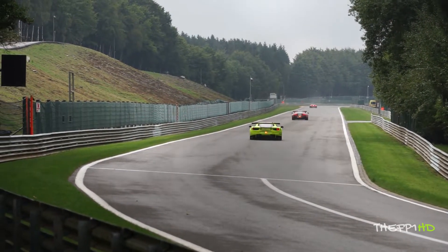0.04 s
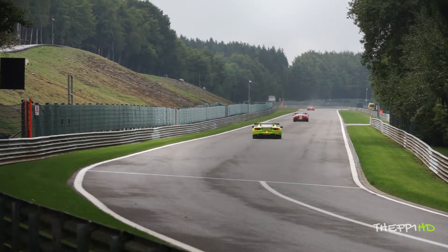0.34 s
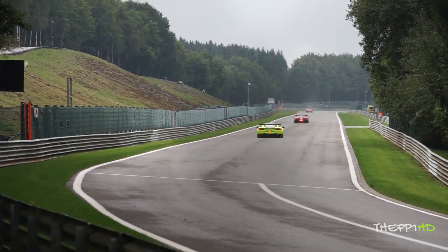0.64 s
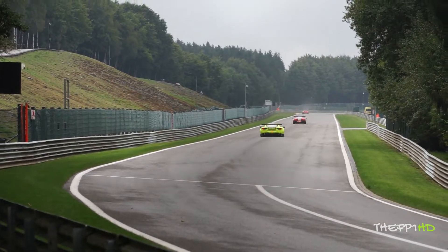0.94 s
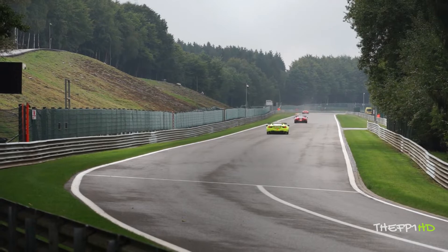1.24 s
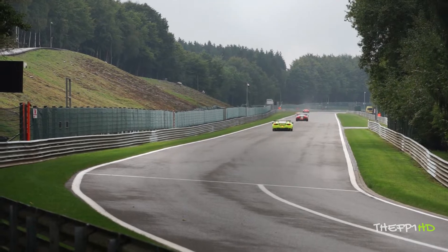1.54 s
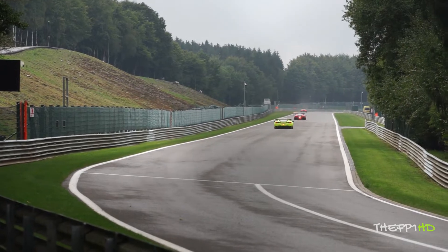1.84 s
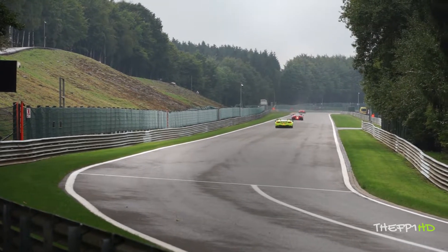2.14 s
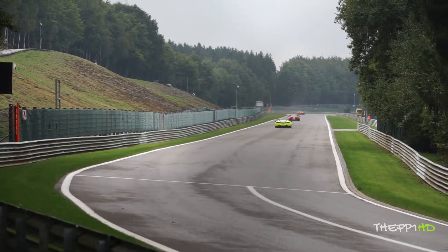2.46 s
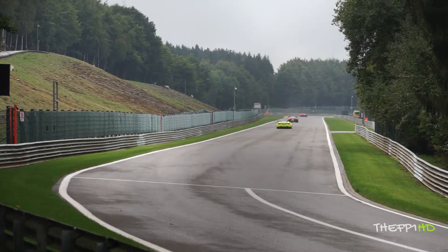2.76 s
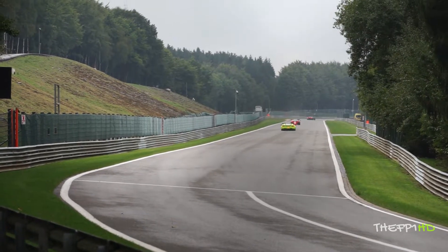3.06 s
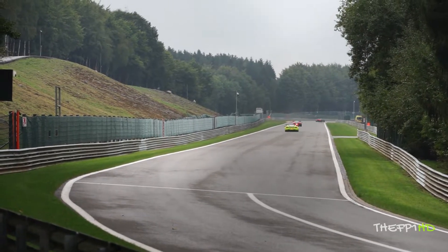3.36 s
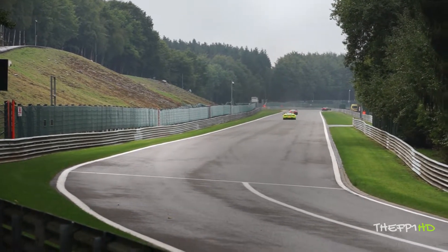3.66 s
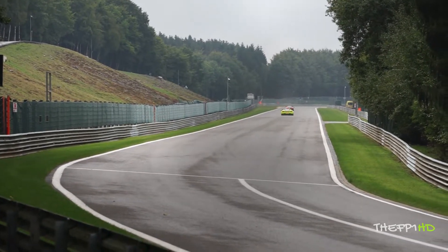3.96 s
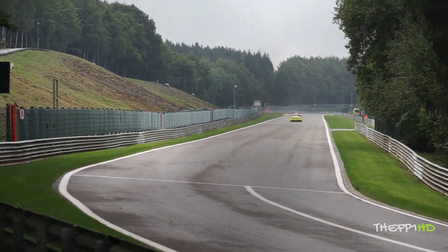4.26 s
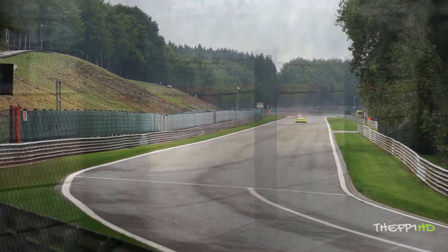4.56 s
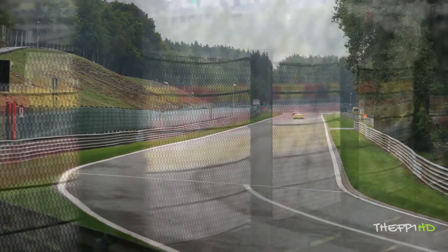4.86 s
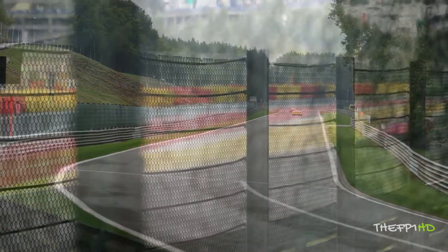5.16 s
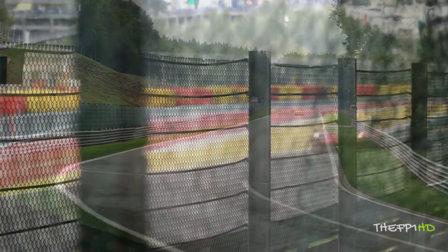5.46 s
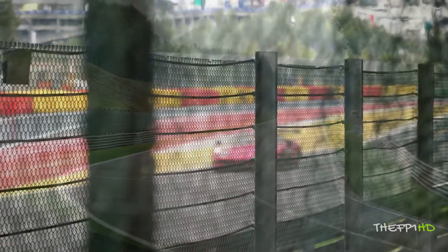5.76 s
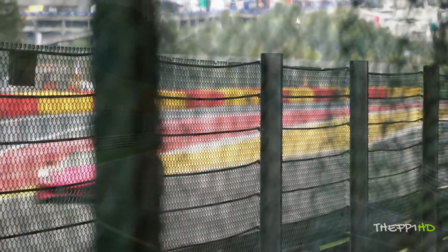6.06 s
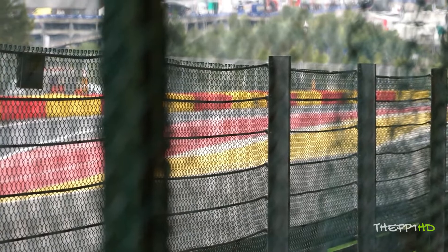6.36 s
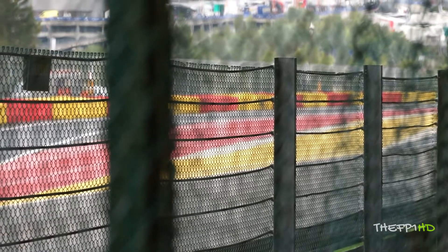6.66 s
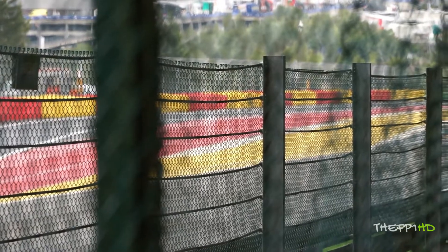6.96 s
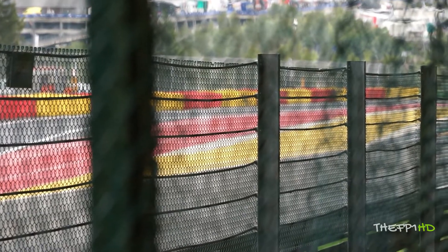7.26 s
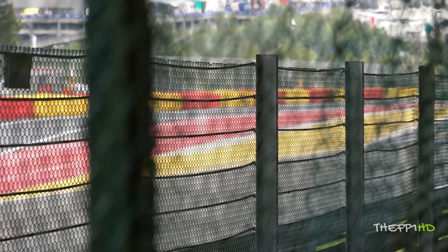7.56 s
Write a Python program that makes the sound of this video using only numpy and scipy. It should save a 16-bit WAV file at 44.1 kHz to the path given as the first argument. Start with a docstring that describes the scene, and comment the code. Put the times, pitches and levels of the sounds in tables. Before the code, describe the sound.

A race car drones away up a damp straight at full throttle, its note barely rising over a rough exhaust roar. A slightly higher engine ahead throbs against it briefly, then eases off. The drone fades and stops as another car approaches and races close past the trackside microphone toward the left. Its howl drops in pitch, with hissing wet tyres and an echo from the barriers.

```python
"""Race cars on a damp track

A V8 engine drones away up the straight, its exhaust puffs so fast that they blend into a note.
A second car hums ahead of it, and each note stops when its driver comes off the throttle.
A third car then races close by toward the left: its note drops, its wet tyres hiss and the barriers echo."""
import sys
import numpy as np
from scipy import signal
from scipy.fft import rfft, irfft, next_fast_len
from scipy.io import wavfile
from scipy.ndimage import uniform_filter1d, map_coordinates

SR = 44100
rng = np.random.default_rng(int(sys.argv[2]) if len(sys.argv) > 2 else 0)


def to_wav(sig):
    """Store sig (one row per channel, or 1-D mono) as 16-bit WAV at the path in sys.argv[1].

    Samples outside -1..1 are clipped; the rate is SR.
    """
    pcm = np.clip(np.atleast_2d(sig), -1, 1) * 32767
    pcm = np.round(pcm).astype(np.int16)
    wavfile.write(sys.argv[1], SR, pcm.T)  # frames by channels


N = 335601
T = np.arange(N) / SR
PASS_S = 7.043  # the moment the third car is closest

# hiss of water thrown up by tyres: (frequency [Hz], relative level [dB])
SPRAY_TONE = [(3500, -23.5), (6500, 9.5), (8500, 6), (11000, 3), (13500, -1), (15700, -14)]


def v8(angle):
    """Eight firings per engine cycle make the drone; uneven exhaust pipes add weaker tones."""
    # strongest overtones: (multiple of the cycle rate, level above the drone [dB], left minus right [dB])
    overtones = [(12, -20.5, 0), (16, -21, -5.5), (20, -24.5, -8.5)]
    # an overtone sings out: (multiple of the cycle rate, middle [s], half length [s], boost [dB])
    swells = [(20, 0.32, 0.23, 11.5), (20, 1.27, 0.12, 9), (16, 2.4, 1.2, 6), (20, 2.89, .55, 11.5),
              (12, 3.4, 1.48, 9.5), (20, 3.8, .17, 13.5), (20, 5.15, 0.41, 9.5)]
    # weaker tones: (multiple of the cycle rate, relative level [dB])
    weak_tones = [(1, -47.5), (2, -36), (3, -35.5), (4, -20), (5, -37.5), (6, -13.5), (7, -14.5), (9, -18),
                  (10, -31.5), (11, -22), (13, -24), (14, -39), (15, -32), (17, -39), (18, -29.5),
                  (19, -23), (21, -43), (22, -23), (23, -30), (24, -25), (25, -35), (26, -39.5), (27, -36),
                  (28, -28), (29, -37), (30, -38), (31, -33.5), (32, -33)]
    drone_db, rumble_db, roar_db = exhaust_levels()
    drone = amp(drone_db - 0.23) * tone(8 * angle, scatter=0.021, rate=22, apart=0.72)
    out = pan(drone, left_db=-3 + 0.43 * T)  # drifts from the right toward the middle
    for k, db, left_db in overtones:
        boost_db = sum(boost * swell(s, half, flatness=4) for which, s, half, boost in swells if which == k)
        overtone = tone(k * angle, scatter=0.13, rate=9, apart=0.95)
        out += pan(amp(drone_db + db + boost_db) * overtone, left_db)
    throb, burble = amp(rumble_db + 9.5), amp(roar_db + 9)
    for k, db in weak_tones:
        gain = throb if k < 8 else burble
        out += amp(db) * gain * tone(k * angle, scatter=0.44, rate=5, apart=0.34)
    return out * (1 - ramp(5.83, 0.046))  # the driver comes off the throttle


def exhaust_levels():
    """The V8's drone, rumble and roar in dB: the two noises partly follow the drone."""
    # the drone as the car drives away: (time [s], level [dB])
    drone_levels = [(0.06, -14.5), (0.54, -12), (1.88, -11.5), (2.59, -12), (2.63, -13), (3.27, -12),
                    (3.38, -13), (4.22, -12), (5.18, -17), (5.8, -23.5)]
    drone_db, = curves(drone_levels)
    swing_db = drone_db + 12.5
    rumble_db = -31.5 + 0.9 * swing_db + 1.12 * T
    roar_db = -25 + 0.55 * swing_db
    return drone_db, rumble_db, roar_db


def exhaust_noise(angle):
    """The V8's exhaust gas rumbles, roars in puffs and rasps; distance takes the rasp first."""
    # low, middle and high gas noise, each: (frequency [Hz], relative level [dB])
    rumble_tone = [(20, -56), (33, -29.5), (45, -15), (85, -18.5), (110, -7.5), (140, 2), (215, 0),
                   (270, -2), (400, -11.5), (900, -70.5)]
    roar_tone = [(150, -22), (330, 4), (560, -0.5), (850, 0.5), (1150, -6), (1600, -9.5), (2300, -15.5),
                 (3200, -25.5), (5000, -40.5), (8000, -67.5)]
    rasp_tone = [(700, -22), (1200, 3), (1700, 10), (2300, 6.5), (3500, 0.5), (5000, -6.5), (6500, -15),
                 (8000, -25), (11000, -46.5), (15000, -54.5)]
    _, rumble_db, roar_db = exhaust_levels()
    puffs = unit(1 + .17 * np.cos(8 * angle) + .16 * np.cos(4 * angle)
                 + .12 * np.sin(2 * angle) + .1 * np.sin(angle))
    rasp = (amp(-33 - 5 * T) + amp(-58.5)) * noise(rasp_tone, patchy_db=2)
    dull = ramp(0.33, 4.6) * (1 - 0.87 * ramp(4.4, .8))  # the treble fades with distance, then returns
    rasp = (1 - dull) * rasp + dull * filtered(rasp, lambda hz: amp(-(hz / 3400) ** 2))
    roar = amp(roar_db) * noise(roar_tone, patchy_db=1.5)
    rumble = amp(rumble_db) * noise(rumble_tone, patchy_db=0.5)
    fade = np.sqrt(1 - ramp(4.47, 2.9))
    return pan((rumble + puffs * roar + rasp) * fade, left_db=-2.5)


def passing_car(speed_m_per_s=61.5, distance_m=14.2, sound_m_per_s=343):
    """A car sweeps by: its sound waves are squeezed as it comes and stretched as it goes (Doppler)."""
    # its noises over time: (time [s], relative exhaust roar [dB], relative machinery rush [dB])
    noise_levels = [(5.92, -37.5, -49), (5.932, -33, -46.5), (6.146, -29, -42), (6.61, -23, -31.5),
                    (6.81, -26.5, -32), (7.506, -23, -30.5), (7.52, -26, -32.5)]
    # exhaust roar and machinery rush, each: (frequency [Hz], relative level [dB])
    roar_tone = [(40, -46), (110, -11), (180, 1.5), (260, -4), (360, 6.5), (600, 5), (900, 5.5),
                 (1300, 0.5), (2100, -8.5), (3000, -15), (5000, -43.5), (9000, -68.5)]
    rush_tone = [(1200, -17), (1900, 2), (2500, 0.5), (3600, -1.5), (4800, -5), (6000, -8), (7500, -16.5),
                 (10000, -37.5), (15000, -50.5)]
    past_m = speed_m_per_s * (T - PASS_S)
    away = past_m / np.hypot(past_m, distance_m)  # -1 coming, 0 closest, 1 going
    firing_hz = 183.6 + 3.64 * (T - PASS_S)  # one row of six cylinders, slowly revving up
    heard_hz = firing_hz / (1 + away * speed_m_per_s / sound_m_per_s)
    angle = cycle_angle(heard_hz / 6 * (1 + .002 * wobble(30)))
    fade_in_db = 12 * np.minimum(T - 5.74, 0)  # the third car's sound fades in
    roar_db, rush_db = curves(noise_levels)
    puffs = unit(1 + 0.1 * np.cos(6 * angle) + 0.072 * np.cos(angle))
    roar = amp(roar_db + fade_in_db + 3) * noise(roar_tone, patchy_db=1.5)
    rush = amp(rush_db + fade_in_db + 1) * noise(rush_tone, patchy_db=1.8)
    cloud = spray_and_wind()
    left_db = 5.5 + 2.2 * away
    car = pan(passing_engine(angle, fade_in_db), left_db) + pan(puffs * (roar + rush), .45 * left_db)
    right_delay_ms = 0.11 + 0.077 * away  # the right ear hears it later and later
    car[1] = map_coordinates(car[1], [np.arange(N) - right_delay_ms / 1000 * SR], order=3)
    return ramp(4.4, 0.5) * (car + pan(cloud, .2 * left_db))  # the wide cloud has little direction


def passing_engine(angle, fade_in_db):
    """We hear the air intake and whining gears as the car comes, and its tail pipes as it goes."""
    # engine tones: (multiple of the cycle rate, relative level in front [dB], relative level behind [dB])
    engine_tones = [(3.88, -24, -35), (4.974, -4, -35.5), (6.045, 2, -2), (6.7, -27, -15.5),
                    (8.93, -22.5, -24), (9.89, -21.5, -35), (11.06, -19, -16.5), (12.1, 3, 0),
                    (18.15, -6.5, -1), (24, -10.5, -1), (30.1, -10.5, -6.5), (30.65, -20, -4),
                    (36, -14, -16.5), (41.9, -27, -25.5), (48.8, -24.5, -14), (53.5, -24, -21),
                    (61.2, -26, -15.5), (65, -34, -14.5), (73.3, -32, -14.5)]
    clear = (1 - np.cos(np.pi * ramp(6.045, 0.48))) / 2  # the car comes into the open
    engine_db = -34.5 + fade_in_db + 13 * clear - 8 * np.maximum(T - 7.01, 0)
    far, facing = 1 - ramp(6.17, 0.32), swell(6.67, 0.21)
    beside, behind = swell(PASS_S - .05, 0.4), ramp(7.0, .36)
    howl_db = 5.5 * swell(7.02, 0.29) - 3.5  # the full firing note is beamed just ahead of the car
    growl_db = 4 - 15 * ramp(6.26, 0.6)  # the low growl shrinks as it nears
    boost_db = {12: howl_db, 5: growl_db}
    out = np.zeros((2, N))
    for k, front_db, rear_db in engine_tones:
        flutter_db = 3.1 * far * wobble(22)  # moving air on the long path
        db = engine_db + front_db + behind * (rear_db - front_db) + boost_db.get(round(k), 0) + flutter_db
        phase = k * angle
        if k >= 40:  # the highest tones are thrown forward
            db = db + 7 * facing
        if k >= 18:  # from the side, only a smeared part of the high tones gets through the fence
            db = db - 2.6 * beside
            phase = phase + (.22 + 1.2 * beside) * wobble(45)
        out += amp(db) * tone(phase, scatter=.01 * k, rate=18, apart=.6)
    gear_whine = sum(tone(k * angle, scatter=3, rate=170, apart=1.5) for k in (128, 133))
    out += amp(-45) * facing * gear_whine
    echo = barrier_echo(out)
    return out + amp(-18) * echo.mean(axis=0) + amp(-12) * echo


def spray_and_wind():
    """The passing car pushes a gust of air ahead of it and trails a hissing cloud of spray."""
    # the gust: (frequency [Hz], relative level [dB])
    gust_tone = [(20, -40), (33, -19.5), (45, -11), (80, 2), (125, 1.5), (200, 11.5), (400, -20.5),
                 (900, -63.5)]
    gust = amp(-26.5 + 2.7 * wobble(12)) / np.hypot(1, (T - 6.45) / .55) ** 2
    spray_db = -40 - 102.5 * np.log10(np.hypot(1, (T - 7.155) / 0.77))  # falls steeply with distance
    spray = amp(spray_db + 2 * wobble(9) + 1.2 * wobble(80)) + amp(-81.5)
    return spray * noise(SPRAY_TONE, patchy_db=0.1) + gust * noise(gust_tone, patchy_db=1)


def barrier_echo(x, decay_s=0.91, build_s=0.076, size=32768):
    """Walls and stands throw back a blur of echoes, different at each ear."""
    t = np.arange(size) / SR
    tail = rng.standard_normal((2, size)) * amp(-60 * t / decay_s) * (1 - np.exp(-(t / build_s) ** 2))
    return signal.fftconvolve(x, tail / np.linalg.norm(tail[0]), axes=1)[:, :N]


def car_ahead():
    """A slightly higher engine note throbs against the V8 until its driver eases off."""
    # its note: (time [s], firing rate [Hz], level [dB])
    note = [(0, 338.6, -34), (.4, 336.5, -32), (1, 343, -36.5), (1.35, 346, -33.5), (1.43, 339.5, -41),
            (1.55, 314, -34), (1.7, 305.7, -63.5)]
    # its tones: (multiple of the cycle rate, relative level [dB])
    engine_tones = [(4, -5), (5, -16.5), (8, 5.5), (12, -19.5), (16, 2.5), (20, -18.5), (24, -6.5)]
    firing_hz, note_db = curves(note)
    angle = cycle_angle(firing_hz / 8)
    return sum(amp(note_db + db) * tone(k * angle, scatter=0.037, rate=6.9, apart=0.16)
               for k, db in engine_tones)


def v8_spray():
    """The hiss of the V8's wet tyres is soon lost in the air."""
    return amp(-64 - 18 * T) * noise(SPRAY_TONE, patchy_db=0.5)


def ticks(size=512, crackles=110, decay_s=.005):
    """Tiny dry ticks close by, over a fainter crackle."""
    # the clearer ticks: (time [s], relative level [dB])
    clear_ticks = [(1.116, -45), (1.713, -49), (1.7775, -48.5), (2.212, -58), (2.587, -47.5), (2.8903, -47),
                   (3.1431, -58.5), (3.488, -63)]
    out, t = np.zeros((2, N)), np.arange(size) / SR
    crackle = [(when * (T[-1] - .1), -63 + 12 * loud ** 2) for when, loud in rng.random((crackles, 2))]
    for s, db in list(clear_ticks) + crackle:
        start = round(s * SR)
        out[:, start:start + size] += amp(db - 4 - 60 * t / decay_s) * rng.standard_normal((2, size))
    return out


def background():
    """A very faint, steady hush."""
    # the hush: (frequency [Hz], relative level [dB])
    hush_tone = [(20, -8), (60, -6), (1000, 4), (8000, -28.5), (15000, -29.5)]
    return amp(-70.5) * noise(hush_tone)


def tone(phase, scatter, rate, apart, size=1024):
    """One engine tone: a direct wave plus drifting scattered ones, partly different at each ear."""
    coarse = T[::128]
    points = rng.standard_normal((3, size)) + 1j * rng.standard_normal((3, size))
    shared, *ears = [map_coordinates(p, [coarse * rate], mode="wrap") for p in points]
    paths = unit(1 + scatter * (shared + apart * np.array(ears))) * np.exp(2j * np.pi * rng.random())
    wave = np.exp(1j * phase)
    return np.sqrt(2) * np.array([(np.interp(T, coarse, p) * wave).real for p in paths])


def noise(spectrum, patchy_db=0):
    """Stereo noise of strength 1; swirling air gives it louder and softer patches."""
    # how alike the two ears hear it: (frequency [Hz], likeness [0 to 1])
    likeness = [(60, 1), (250, 0.7), (600, 0.37), (1200, 0.44), (2500, 0.5), (5000, 0.69), (9000, 0.38)]

    def shape(hz):
        width = np.arccos(np.clip(along(likeness, hz), -1, 1)) / 2
        return amp(along(spectrum, hz)) * np.array([np.cos(width), np.sin(width)])

    slices = signal.stft(rng.standard_normal((2, N)), nperseg=1024)[2]
    patches = uniform_filter1d(rng.standard_normal(slices.shape[1:]), size=6, axis=0)
    patches = uniform_filter1d(patches, size=9, axis=1)
    pair = signal.istft(slices * amp(patchy_db * unit(patches)), nperseg=1024)[1][:, :N]
    mid, side = filtered(pair, shape)
    return unit(np.array([mid + side, mid - side]))


def cycle_angle(cycle_hz):
    """An angle that turns once per engine cycle, in which every cylinder fires once."""
    return 2 * np.pi * np.cumsum(cycle_hz) / SR


def amp(db):
    """Turns decibels into a gain."""
    return 10 ** (np.asarray(db) / 20)


def unit(x):
    """Scales x to an average strength (rms) of 1."""
    return x / np.sqrt(np.mean(np.abs(x) ** 2) + 1e-20)


def along(points, hz):
    """Joins (frequency, value) points, giving each octave equal room."""
    freqs, values = np.transpose(points)
    return np.interp(np.log(hz + 1), np.log(freqs + 1), values)


def curves(rows):
    """One value per sample for each column after the time."""
    times, *columns = np.transpose(rows)
    return [np.interp(T, times, column) for column in columns]


def ramp(start_s, length_s):
    """Rises from 0 to 1."""
    return np.clip((T - start_s) / length_s, 0, 1)


def swell(middle_s, half_s, flatness=2):
    """1 in the middle, falling away on both sides."""
    return np.exp(-np.abs((T - middle_s) / half_s) ** flatness)


def wobble(rate, size=2048):
    """A smooth curve through `rate` random points a second."""
    coarse = T[::128]
    return np.interp(T, coarse, map_coordinates(rng.standard_normal(size), [coarse * rate], mode="wrap"))


def filtered(x, response):
    """Scales each frequency in x by response(hz)."""
    size = next_fast_len(N + SR // 4, True)
    return irfft(rfft(x, size) * response(np.fft.rfftfreq(size, 1 / SR)), size)[..., :N]


def pan(x, left_db):
    """Makes the left ear left_db louder than the right."""
    return np.array([x[0] * amp(left_db / 2), x[1] * amp(-left_db / 2)])


def scene():
    """Adds up the three cars and the faint sounds around them."""
    # the V8's slowly rising note: (time [s], firing rate [Hz])
    v8_note = [(0, 317.4), (1, 317.4), (2, 322), (3, 323), (4, 325.9), (4.5, 327.5), (5, 328.4),
               (5.9, 330.5)]
    firing_hz, = curves(v8_note)
    angle = cycle_angle(firing_hz / 8)
    return (v8(angle) + car_ahead() + exhaust_noise(angle) + v8_spray()
            + passing_car() + ticks() + background())


def record(dry, top_hz=15720):
    """Cuts off the very highest treble."""
    return filtered(dry, lambda hz: hz < top_hz)


dry = scene()
out = record(dry)
to_wav(out)
```